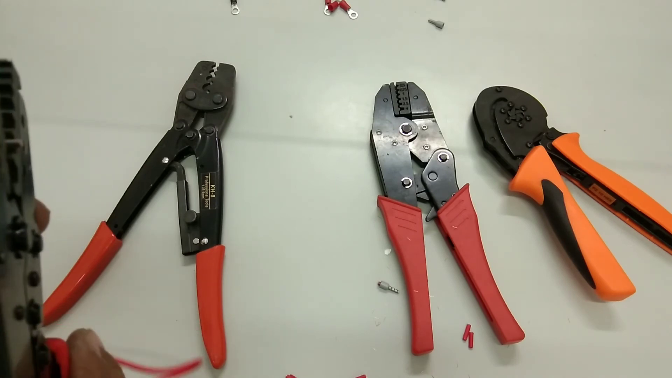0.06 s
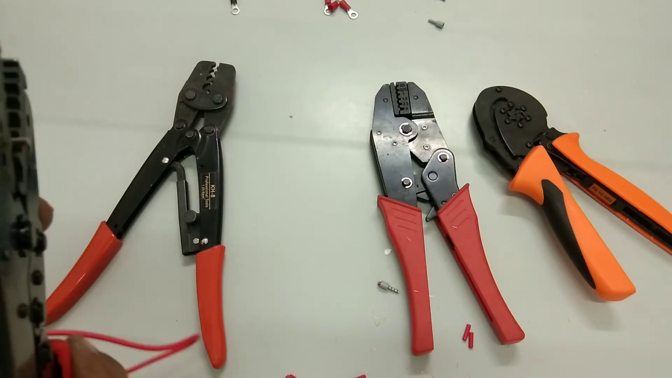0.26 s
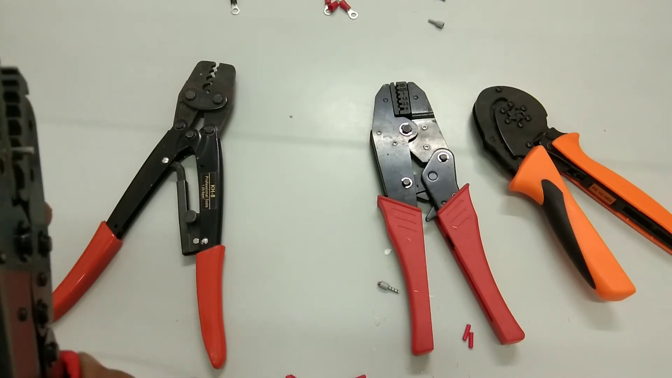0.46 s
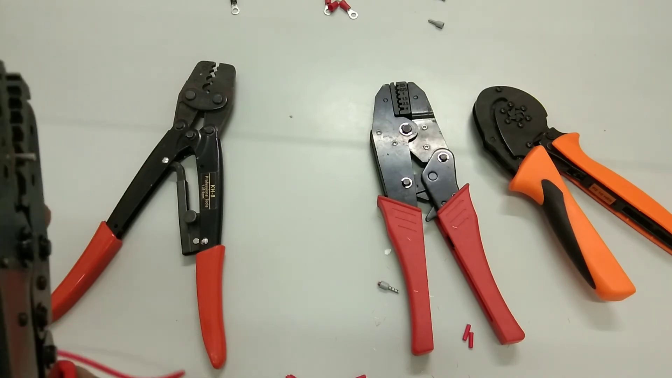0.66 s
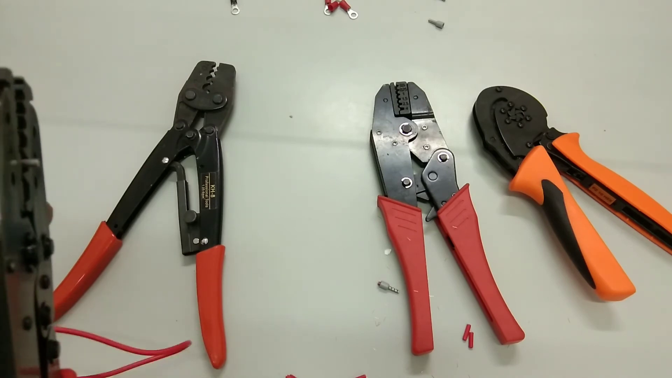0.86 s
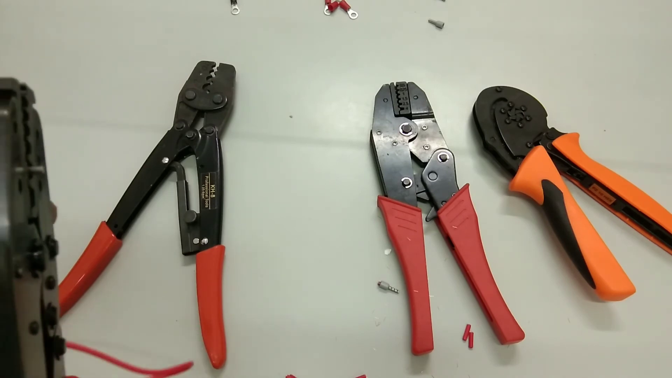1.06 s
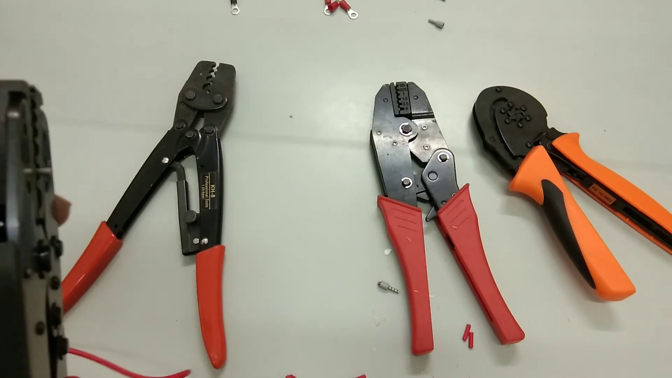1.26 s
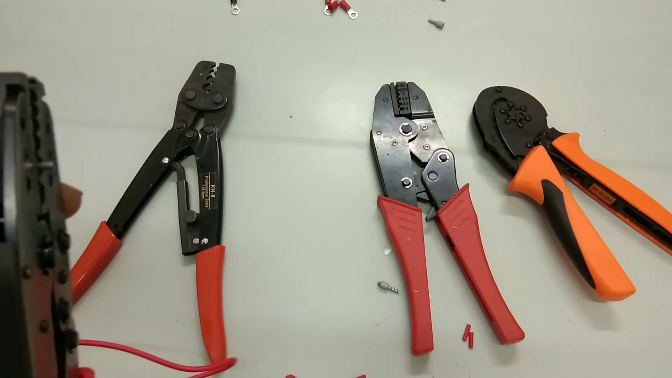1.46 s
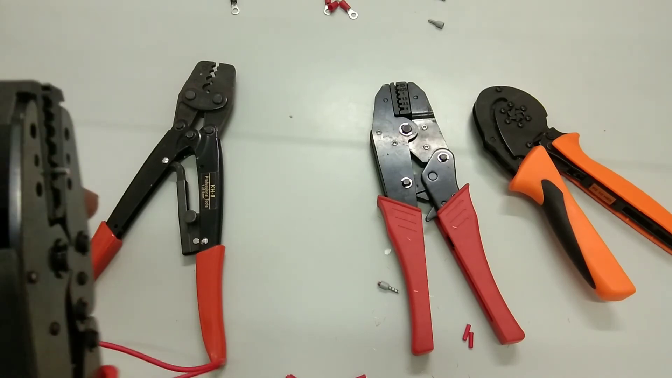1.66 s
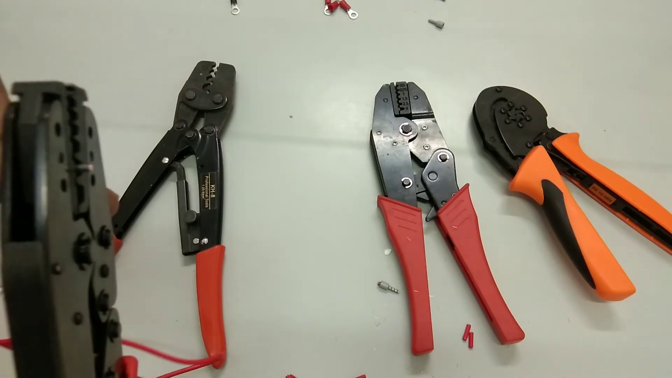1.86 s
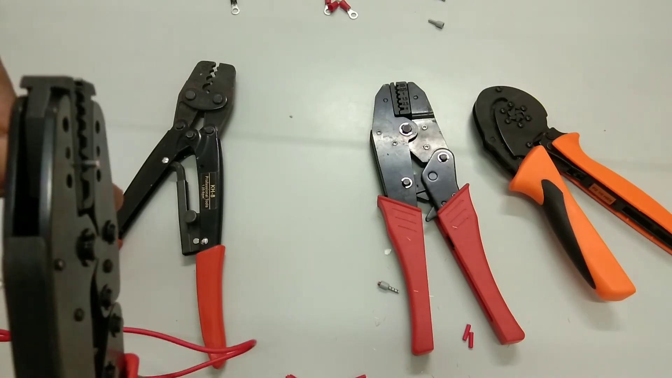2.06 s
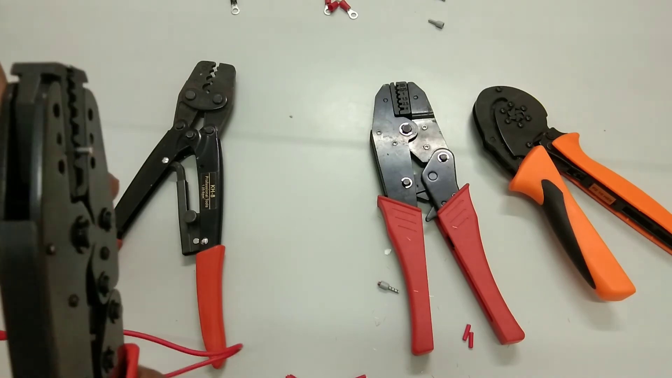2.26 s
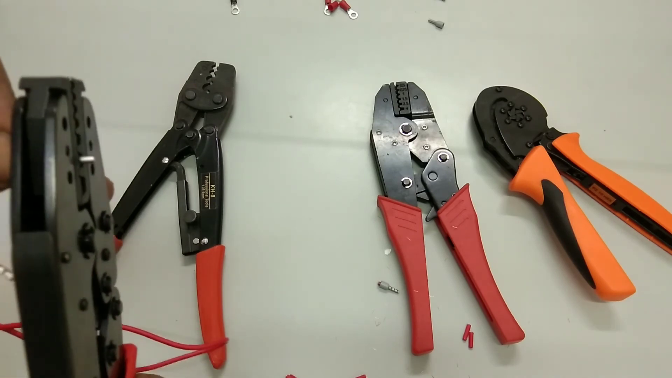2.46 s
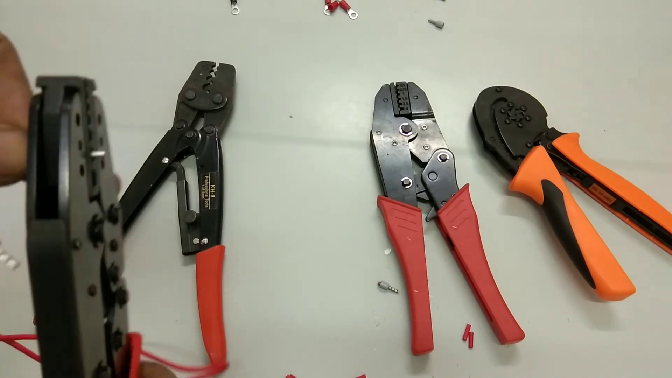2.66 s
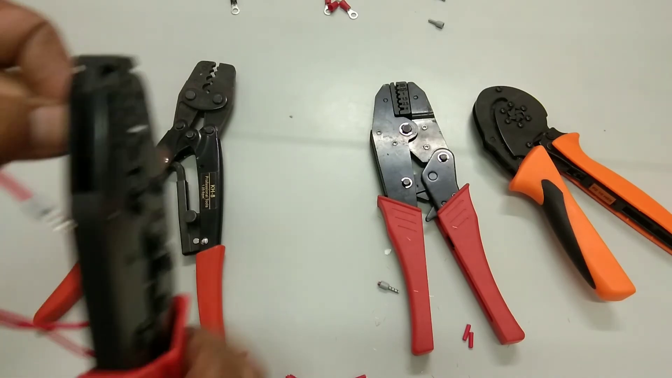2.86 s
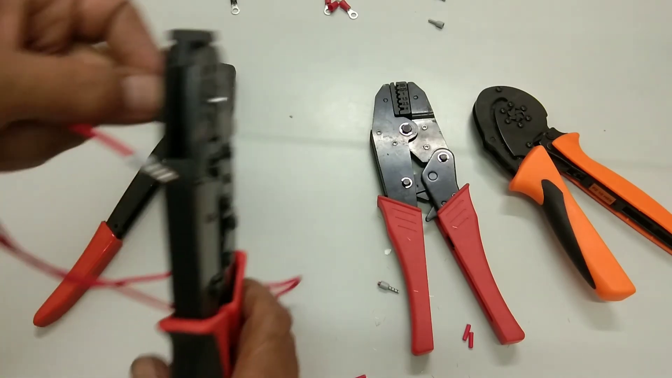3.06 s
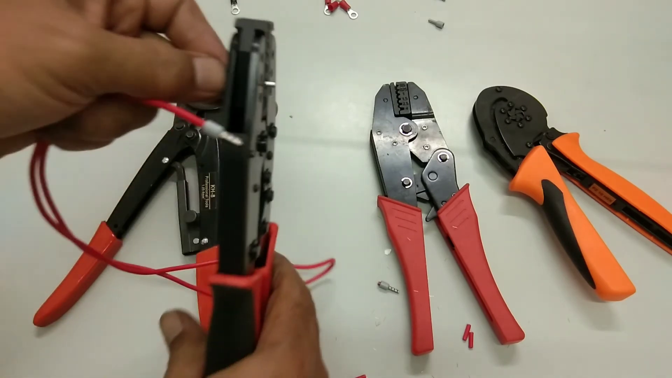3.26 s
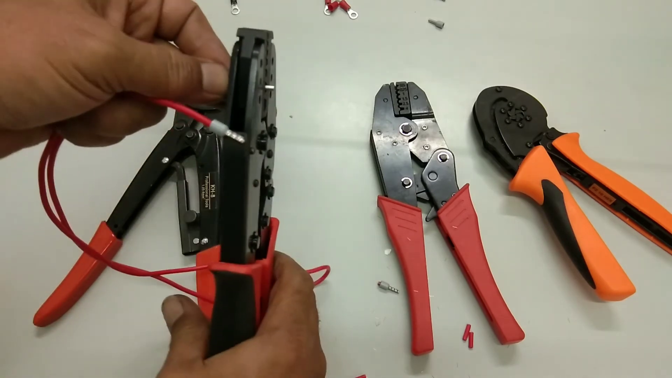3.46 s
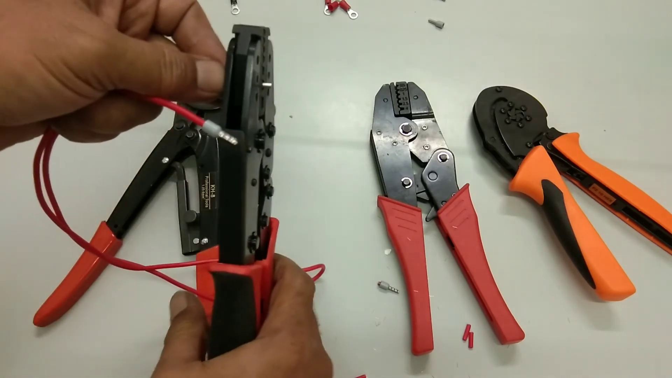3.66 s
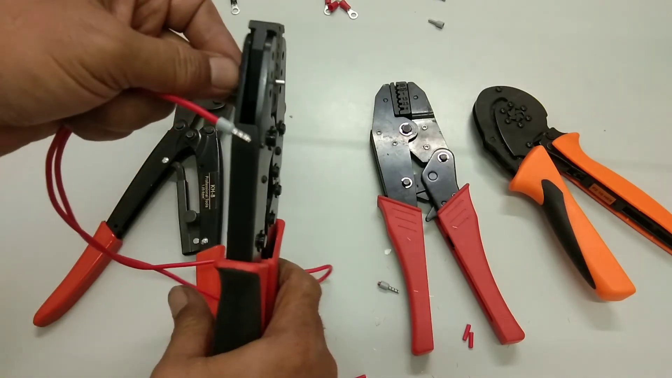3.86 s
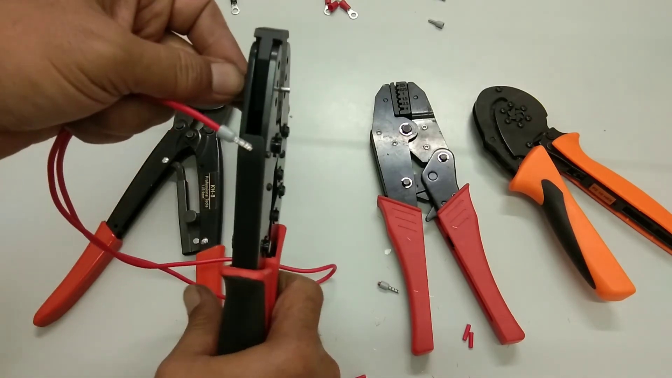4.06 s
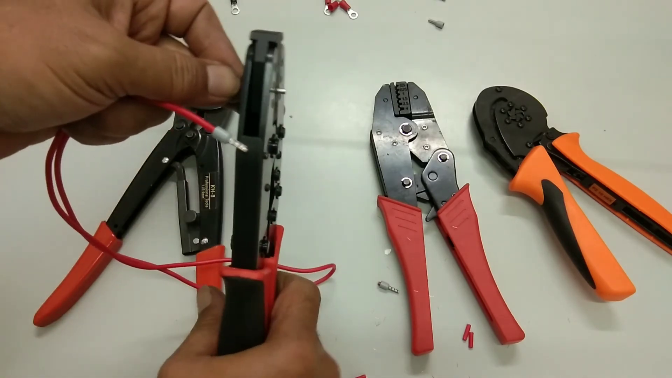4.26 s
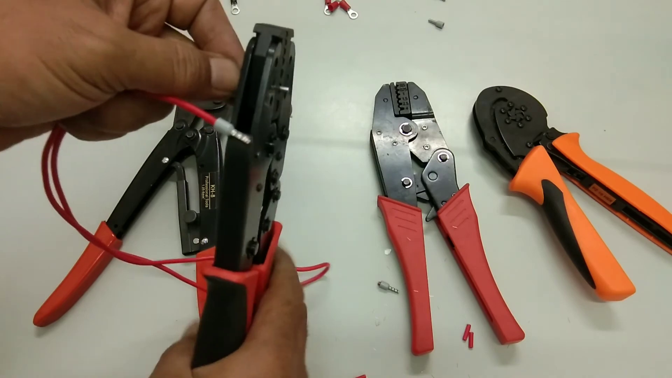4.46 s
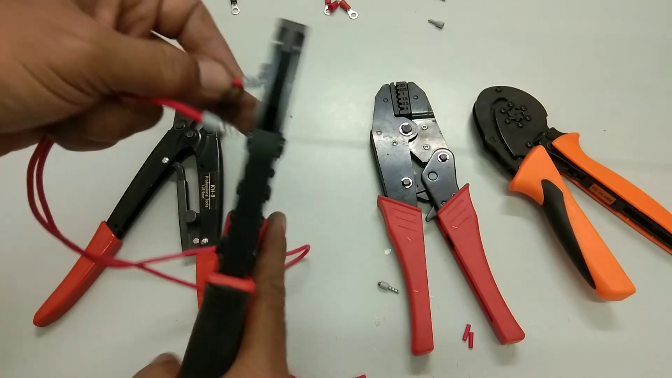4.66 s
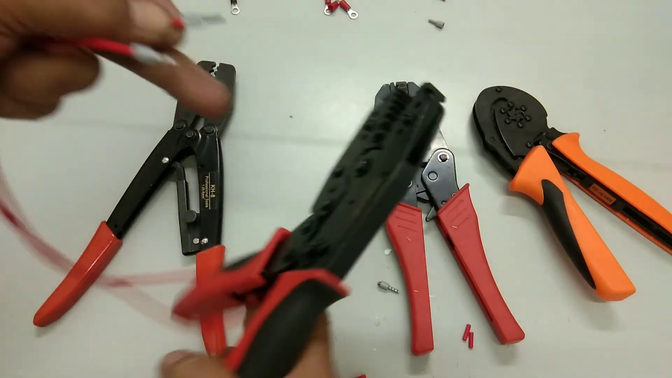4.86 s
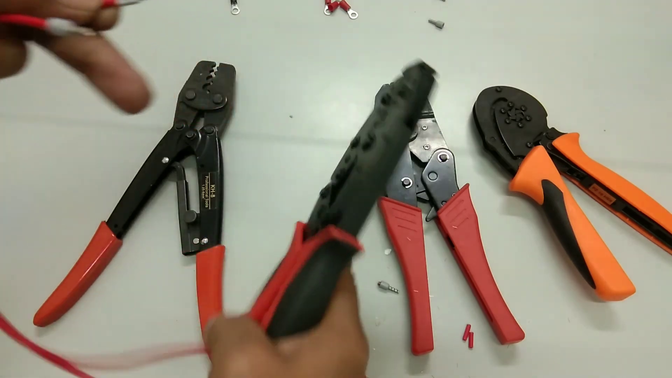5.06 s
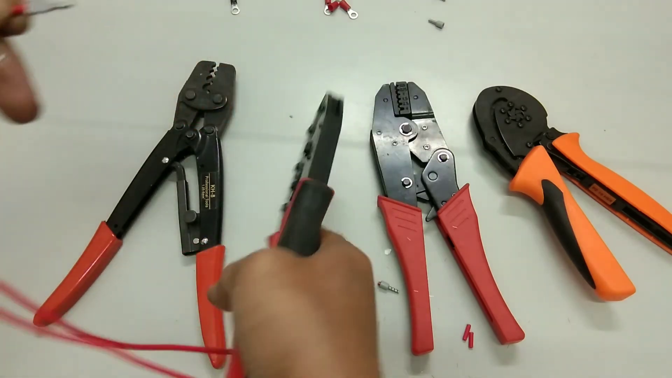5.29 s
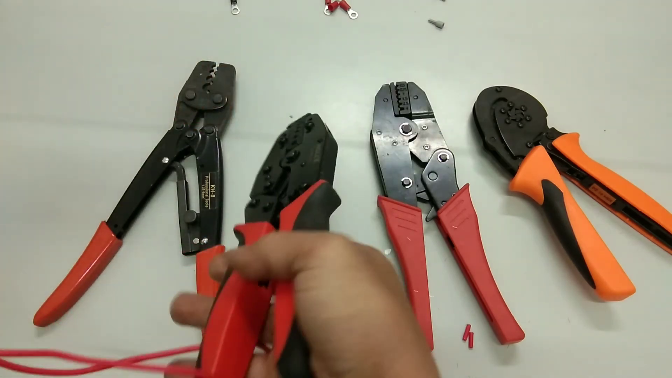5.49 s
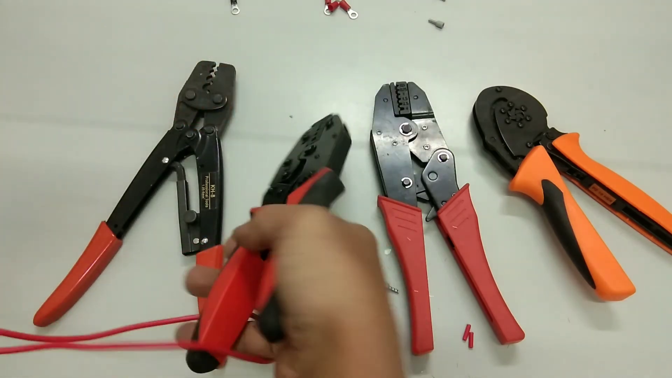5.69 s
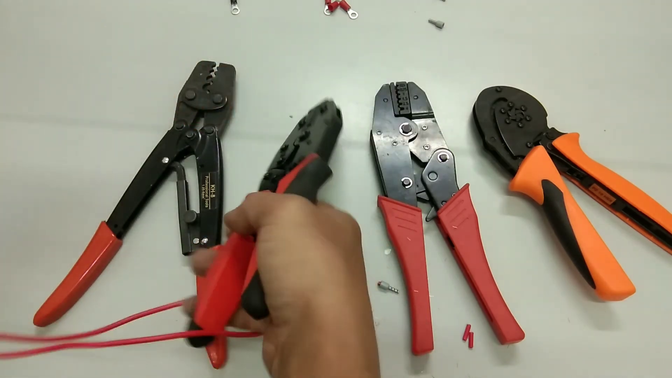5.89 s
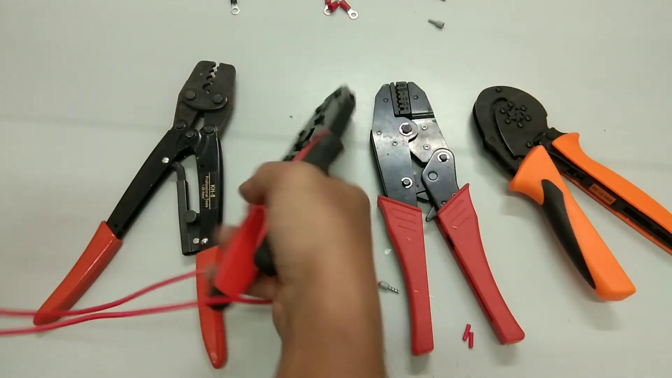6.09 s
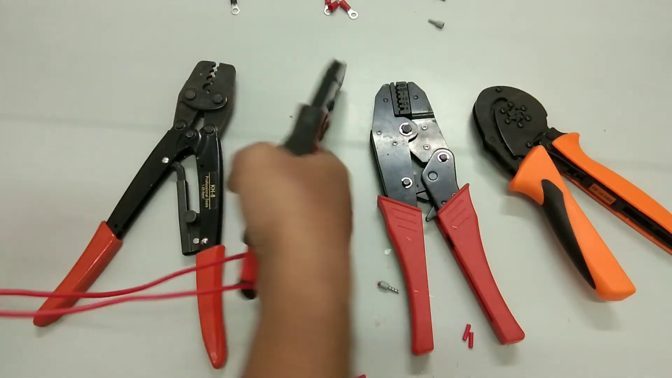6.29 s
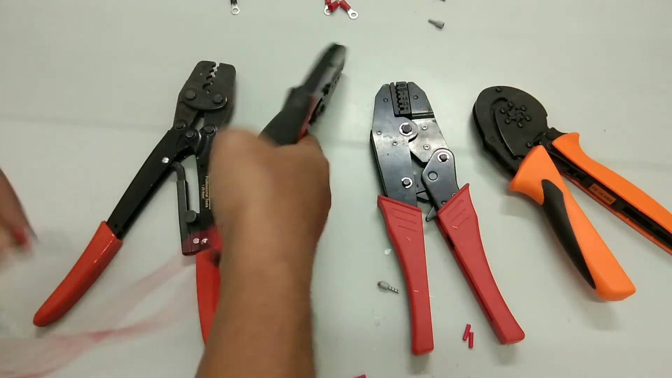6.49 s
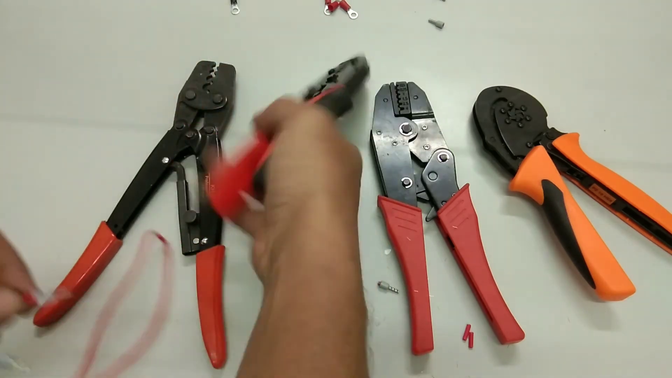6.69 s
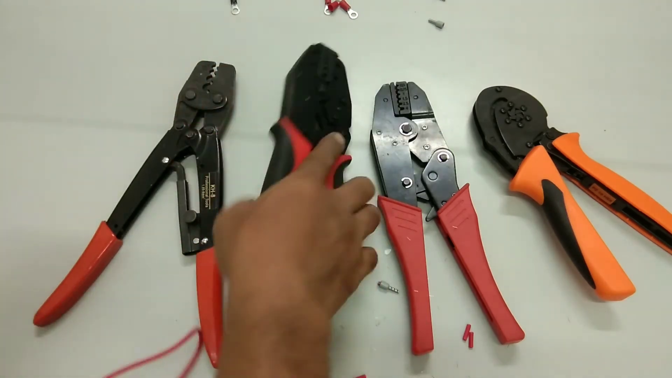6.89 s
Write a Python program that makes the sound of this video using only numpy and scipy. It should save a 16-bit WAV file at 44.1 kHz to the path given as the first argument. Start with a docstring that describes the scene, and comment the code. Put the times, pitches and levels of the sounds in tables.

```python
"""Ratchet crimping pliers in a small hard room

A fan hums throughout. Steel links click and a return spring twangs as a terminal is squeezed; the jaws
snap free, the pawl runs over six teeth, and the pliers knock and slide as they settle on a hard table.
Contacts drive broad resonances of linkage, pawl or table; these set off narrow modes and wall echoes.
The fan is coloured noise plus wavering tones; sliding is two bands of noise."""
import sys
import numpy as np
from scipy import signal
from scipy.fft import rfft, irfft
from scipy.io import wavfile
from scipy.ndimage import uniform_filter1d, minimum_filter1d

SR = 44100
rng = np.random.default_rng(int(sys.argv[2]) if len(sys.argv) > 2 else 0)


def inscribe(sig):
    """Save sig as 16-bit PCM at rate SR to the path in sys.argv[1].

    A 1-D sig is mono; a 2-D sig holds one channel per row.
    Samples are clipped to [-1, 1] before scaling.
    """
    pcm = np.round(np.clip(np.atleast_2d(sig).T, -1, 1) * 32767)
    wavfile.write(sys.argv[1], SR, pcm.astype(np.int16))


N = 305613
TIME = np.arange(N) / SR

# broad resonances of the steel linkage: centre_hz, width_hz, relative_db
LINKAGE = [(1280, 1100, -5.5), (2700, 790, -0.5), (4320, 1540, .2), (6980, 2050, -3.5)]


def from_db(db):
    """Decibels to gain."""
    return 10 ** (np.asarray(db) / 20)


def rms_one(x):
    """Scale to unit rms."""
    return x / np.sqrt(np.mean(x ** 2) + 1e-20)


def at_hz(points, hz):
    """Read a (hz, value) table on a log-frequency axis."""
    known_hz, values = np.transpose(points)
    return np.interp(np.log(np.maximum(hz, 1)), np.log(known_hz), values)


def add(track, start_s, sound):
    """Mix a sound into the track at a given time."""
    start = int(start_s * SR)
    track[start:start + len(sound)] += sound[:N - start]


def noise(spectrum):
    """Steady noise of a given colour above 32 Hz, rms 1."""
    hz = np.arange(N // 2 + 1) * SR / N
    colour = from_db(at_hz(spectrum, hz)) * (hz > 32)
    return rms_one(irfft(rfft(rng.standard_normal(N)) * colour, N))


def resonate(x, centre_hz, width_hz):
    """A resonance as a band-pass, its edges in geometric balance about the centre."""
    low_hz = np.hypot(centre_hz, width_hz / 2) - width_hz / 2
    band = signal.butter(2, [low_hz, low_hz + width_hz], "band", fs=SR, output="sos")
    return signal.sosfilt(band, x)


def ring(x, modes, ring_db):
    """Blows leave narrow modes ringing: each is a decaying cosine, t60 at most 0.4 s."""
    out = np.zeros(N)
    for hz, db, t60_s in modes:
        radius = np.exp(-np.log(1000) / (min(t60_s, .4) * SR))
        w = 2 * np.pi * hz / SR
        zeros = [1, -radius * np.cos(w)]
        poles = [1, -2 * radius * np.cos(w), radius ** 2]
        out += from_db(db + ring_db) * signal.lfilter(zeros, poles, x + 1e-18)
    return out


def room(x, first_echo_s, build_s, wet_db, size=26000):
    """Dense wall echoes build up after a short gap and die away band by band."""
    # decay of the tail: centre_hz, t60_s
    room_t60 = [(130, 0.2), (550, 0.37), (2800, 0.3), (7500, 0.28)]
    # tail level before wet_db: centre_hz, relative_db
    room_db = [(120, -4), (500, -5), (1500, -1.5), (3000, -7), (5000, -7), (8000, -5.5)]
    t = np.arange(size) / SR
    onset = 1 - np.exp(-np.maximum(t - first_echo_s, 0) / build_s)
    edges_hz = np.geomspace(60, 10000, 16)
    response = np.zeros(size)
    for low_hz, high_hz in zip(edges_hz, edges_hz[1:]):
        centre_hz, width_hz = np.sqrt(low_hz * high_hz), high_hz - low_hz
        decay = np.exp(-np.log(1000) * t / at_hz(room_t60, centre_hz))
        tail = resonate(rng.standard_normal(size), centre_hz, width_hz) * onset * decay
        gain = from_db(at_hz(room_db, centre_hz)) * np.sqrt(2 * width_hz / SR)
        response += gain * tail / np.linalg.norm(tail)
    return from_db(wet_db) * signal.fftconvolve(x, response)[:N]


def drives(resonances, strength_db, bright_db_per_octave, pivot_hz):
    """Drive level of each resonance: positive brightness favours those above the pivot."""
    return strength_db + bright_db_per_octave * np.log2(np.array(resonances)[:, 0] / pivot_hz)


def at_node(nearness, loss_db):
    """A contact near a node hardly moves the resonances that stand still there."""
    return nearness * np.array(loss_db)


def blows(rows, resonances, scatter_s, scatter_db, size=4096):
    """Each contact drives every resonance by its own amount (dB rms over 4 ms).
    Returns the sound sent into the room, and the sound near by, thickened by echoes off hand and tool."""
    t = np.arange(size) / SR
    sent, near = np.zeros((2, N))
    unit = np.sqrt(SR / 250)   # unit energy to unit rms over 4 ms
    for start_s, *drives_db in rows:
        force = rng.standard_normal(size) * (t < scatter_s)
        force *= from_db(scatter_db) / np.linalg.norm(force)
        force[0] += 1
        for k, ((hz, width_hz, db), drive_db) in enumerate(zip(resonances, drives_db)):
            level = (-1) ** k * unit * from_db(db + drive_db)   # neighbours in opposite sign
            for track, push in ((sent, signal.unit_impulse(size)), (near, force)):
                motion = resonate(push + 1e-18, hz, width_hz)
                add(track, start_s, level * motion / np.linalg.norm(motion))
    return np.array([sent, near])


def fan(waver_rad=0.69):
    """Moving air as coloured noise, and motor and blade tones whose phase wanders slightly."""
    # spectrum of the air: hz, relative_db_per_hz
    air = [(15, -49.5), (25, -19.5), (53, -11.5), (71, -19), (90, -9.5), (153, -2.5), (209, -4.5),
           (230, -11.5), (286, -15.5), (315, -17), (733, -27), (868, -28.5), (1710, -34.5), (7260, -44),
           (8000, -56.5), (10400, -79.5), (17600, -120)]
    # motor and blade tones: pitch_hz, rms_db
    tones = [(48.4, -63.5), (100, -58.5), (145.3, -56.5), (199.2, -55.5), (290.7, -66.5), (576, -73),
             (861.3, -73)]
    out = from_db(-49.5) * noise(air)
    knots_s = np.linspace(0, TIME[-1], 30)
    for hz, db in tones:
        wander = waver_rad * np.interp(TIME, knots_s, rng.standard_normal(len(knots_s)))
        phase = wander + rng.uniform(0, 2 * np.pi)
        out += from_db(db) * np.sqrt(2) * np.sin(2 * np.pi * hz * TIME + phase)
    return out


def return_spring():
    """The spring slips on its seat or unloads; each slip plucks all its modes."""
    # slips: start_s, strength_db
    twangs = [(0.9193, -67), (0.969, -59), (2.1035, -45), (3.9712, -42), (4.0102, -32), (4.5523, -20)]
    # modes: pitch_hz, relative_db, t60_s
    spring_modes = [(4020, -8.5, 0.33), (4230, 1, 0.078), (4500, -8, .25), (4910, -5.5, .07),
                    (5080, -3.5, .09)]
    plucks = np.zeros(N)
    for start_s, db in twangs:
        add(plucks, start_s, [from_db(db)])
    return ring(plucks, spring_modes, ring_db=-1.0)


def link_clicks():
    """Single clicks of the links drive the linkage, less so for resonances with a node at the contact."""
    # start_s, strength_db, bright_db_per_octave, nearness to the node of the plates' bend (0-1)
    clicks = [(1.041, -40, 4, 0), (1.0629, -40.5, 6.5, .2), (1.6745, -67, -3, 0), (1.738, -63.5, 2, .1),
              (2.0553, -54, 1, .1), (2.1035, -35, 6.5, 0.12), (2.3433, -37, 4, 0.9),
              (2.455, -34.5, 4.5, .85), (2.7315, -57, 1, 0.9), (2.907, -60.5, 7, .1), (3.2394, -64, 5, .3),
              (3.4075, -57.5, -6.5, 0.1), (3.875, -42.5, 1.5, 0.6), (3.971, -28.3, 7.5, 0.3),
              (4.0102, -26, 5, 0.28), (4.069, -29, 3, .05), (4.3454, -42, 7.5, 0.95),
              (4.521, -53.5, 2.5, 0), (4.9307, -58, -6, .15), (5.024, -46.5, 3.5, 0), (6.587, -37, -3, 0.2),
              (6.771, -52.5, -7, .3), (6.8008, -53, 1, .5)]
    # loss_db of each linkage resonance at the node (negative is a gain)
    node_loss_db = [-1.5, 15.5, 1, -1.5]
    rows = []
    for start_s, db, bright, nearness in clicks:
        drive_db = drives(LINKAGE, db, bright, pivot_hz=4080) - at_node(nearness, node_loss_db)
        rows.append((start_s, *drive_db))
    return blows(rows, LINKAGE, scatter_s=0.0034, scatter_db=9.0)


def table():
    """The tool drops on its grips, rocks and slides; knocks make the table top boom."""
    # dull knocks of the grips: start_s, strength_db, bright_db_per_octave, nearness to a node (0-1)
    knocks = [(4.111, -50, -6, 0.4), (4.576, -37.5, -3, 0), (6.0793, -19.5, -1.2, 0),
              (6.3536, -21, -4, 0.88), (6.5163, -22.5, -3, .6), (6.6146, -25, -2, .85),
              (6.735, -22.5, -2, 0.03), (6.8116, -15.5, -2.04, 0.63)]
    # broad resonances under the tool: centre_hz, width_hz, relative_db
    resonances = [(172, 140, -3), (460, 317, 1.5), (880, 504, 0), (2200, 2660, -9.8)]
    # loss_db of each resonance at the node
    node_loss_db = [0, 10, 7, 0]
    # modes of the table top: pitch_hz, relative_db, t60_s (ring() caps it at 0.4 s)
    modes = [(107, -6.5, 0.85), (149.7, -2.5, 0.59), (169.3, 3, 0.56), (227, -3.5, 0.21), (272, -16, 0.49),
             (329, -1.5, .25), (429.5, -4, 0.27), (613, -3, .21), (690, -11, 0.13), (882, 3.5, 0.23),
             (1043, -5, 0.18), (1168, 5, 0.27)]
    # how hard the grips rub: time_s, relative_db
    slide_points = [(5.98, -80), (6.04, -45.5), (6.25, -37), (6.33, -31), (6.42, -34), (6.49, -44.5),
                    (6.7, -35.5), (6.93, -42)]
    # rubbing spectra: hz, relative_db_per_hz
    rumble = [(60, -26.5), (120, -0.5), (190, 7.5), (280, -6.5), (500, -14.5), (1100, -18.5), (2000, -58)]
    hiss = [(600, -14), (1500, 7), (4500, -3), (8000, -15)]

    rows = []
    for start_s, db, bright, nearness in knocks:
        drive_db = drives(resonances, db, bright, pivot_hz=500) - at_node(nearness, node_loss_db)
        rows.append((start_s, *drive_db))
    sent, near = blows(rows, resonances, scatter_s=0.0067, scatter_db=3)
    # a hollow note swells up a moment after every knock
    hollow = np.interp(TIME - .015, TIME, resonate(sent + 1e-18, centre_hz=494, width_hz=35))
    boom = ring(sent, modes, ring_db=-53.5) + from_db(6.5) * hollow
    rubbing = from_db(np.interp(TIME, *np.transpose(slide_points)) - 1.5)
    slide = rubbing * (noise(rumble) + from_db(-25.5) * noise(hiss))
    walls = room(sent, first_echo_s=0.0059, build_s=0.0017, wet_db=1.47)
    return near + boom + walls + slide


def jaw_release():
    """The jaws snap free, rattle open and meet their stop, driving the linkage."""
    # start_s, strength_db, bright_db_per_octave
    release = [(4.5272, -27.5, 0), (4.5375, -25, 1.5), (4.5437, -27.5, 3.5), (4.5483, -26, 3.5),
               (4.5529, -27.5, 4), (4.556, -23.5, -1), (4.5603, -24.5, -0.5), (4.5757, -25.5, 0.5),
               (4.5815, -33, -4.5)]
    # colour_db added to each linkage resonance: the rattle favours the middle ones
    colour_db = [-1, 1, 4, .3]
    rows = [(start_s, *drives(LINKAGE, db, bright, pivot_hz=4000) + colour_db)
            for start_s, db, bright in release]
    return blows(rows, LINKAGE, scatter_s=0.0036, scatter_db=9.5)


def pawl_run(teeth=6):
    """The pawl drops evenly over its teeth, all of one colour, strongest on the third."""
    # broad resonances of the pawl: centre_hz, width_hz, relative_db
    pawl = [(1374, 1200, -19), (2520, 510, -1), (3800, 1570, -6.5), (6800, 3600, -8)]
    start_s, spacing_s, peak_db, loss_db_per_tooth = 5.0731, .01202, -17.5, 1.3
    rows = []
    for k in range(teeth):
        tooth_db = peak_db - abs(k - 2) * loss_db_per_tooth
        rows.append((start_s + k * spacing_s, *[tooth_db] * len(pawl)))
    return blows(rows, pawl, scatter_s=0.0043, scatter_db=7.5)


def pliers():
    """Clicks, release and pawl ring the same steel plates; these contacts and the spring excite the room."""
    # lasting modes of the plates: pitch_hz, relative_db, t60_s
    steel_modes = [(1150, -11, 0.17), (1932, -9, .3), (2195, -7, 0.32), (2404, -4.5, .25),
                   (2463, -0.5, .26), (2564, -1.5, 0.22), (2627, -3, 0.22), (2705, -2, .23),
                   (3760, -8.5, .3), (4007, -3.5, 0.37), (4250, -1, .3), (4582, -2.5, 0.29),
                   (4840, -6, 0.24), (5150, -4, 0.25), (6412, -10.5, 0.32), (7500, -5, 0.32)]
    twangs = return_spring()
    click_sent, click_near = link_clicks()
    snap_sent, snap_near = jaw_release()
    pawl_sent, pawl_near = pawl_run()
    plates = ring(click_sent + snap_sent + from_db(1) * pawl_sent, steel_modes, ring_db=-53.5)
    sent = click_sent + from_db(-1) * (snap_sent + pawl_sent) + from_db(-12) * twangs
    walls = room(sent, first_echo_s=.002, build_s=0.00092, wet_db=-0.03)
    return click_near + snap_near + pawl_near + plates + twangs + walls


def scene():
    """Fan, pliers and table sum into one channel."""
    return (fan() + pliers() + table())[None]


def record(dry):
    """A fast limiter holds down the tallest peaks, and the top is cut steeply."""
    wanted_db = np.minimum(-7.5 - 20 * np.log10(np.abs(dry) + 1e-9), 0)
    gain_db = uniform_filter1d(minimum_filter1d(wanted_db, size=89), size=89)   # about 2 ms
    steep = signal.ellip(8, .5, 70, 7900, fs=SR, output="sos")   # ripple dB, stop dB, edge Hz
    return signal.sosfilt(steep, dry * from_db(gain_db))


dry = scene()
out = record(dry)
inscribe(out)
```